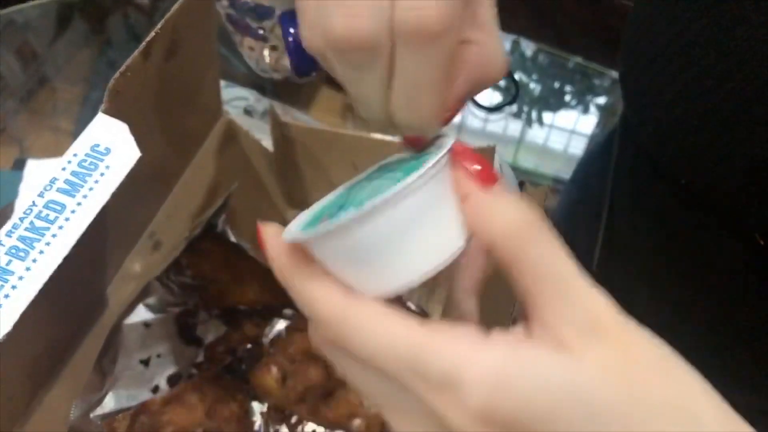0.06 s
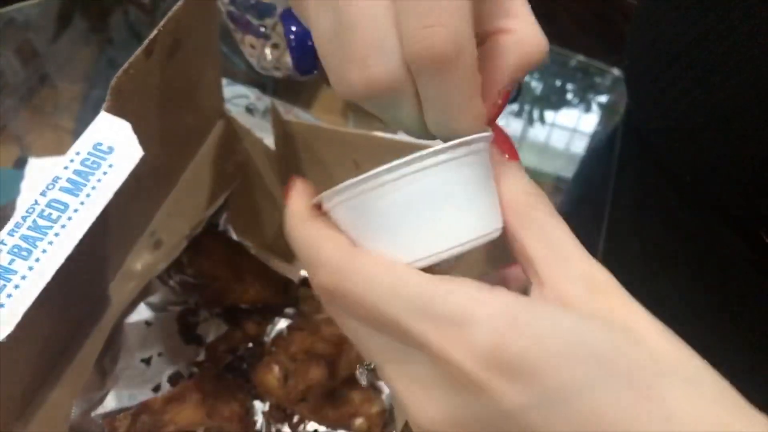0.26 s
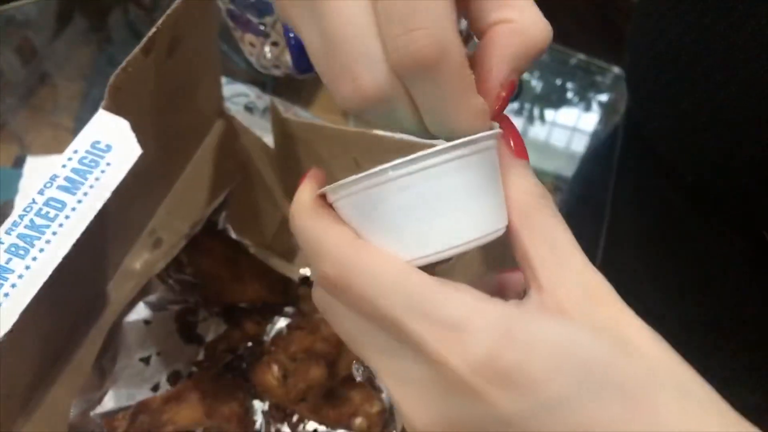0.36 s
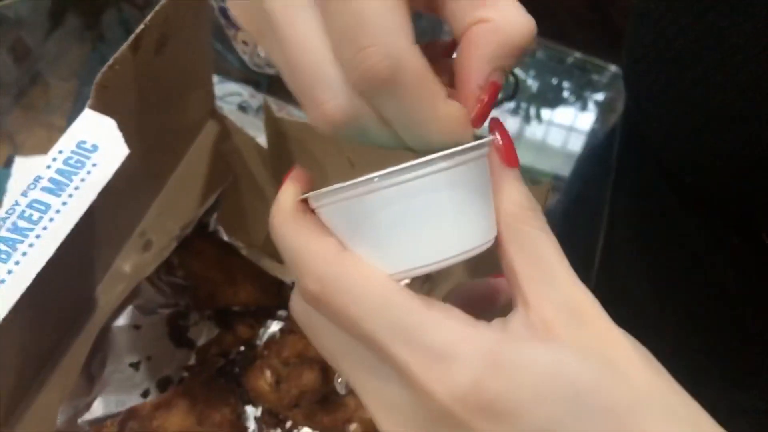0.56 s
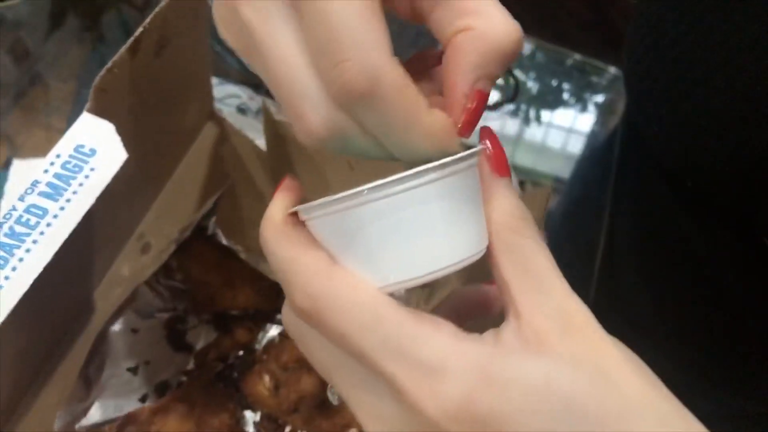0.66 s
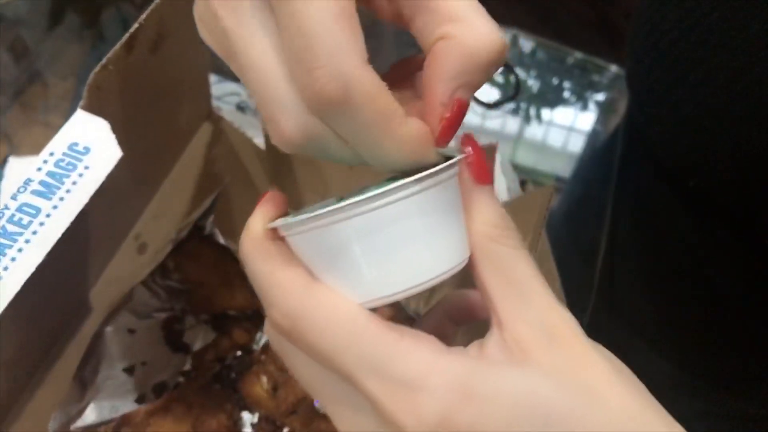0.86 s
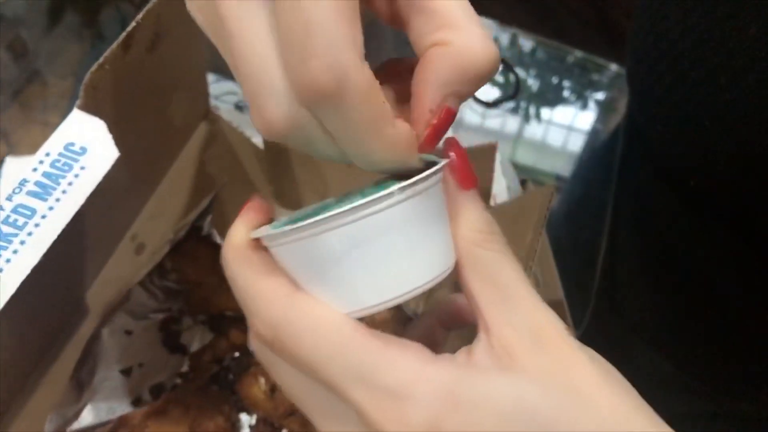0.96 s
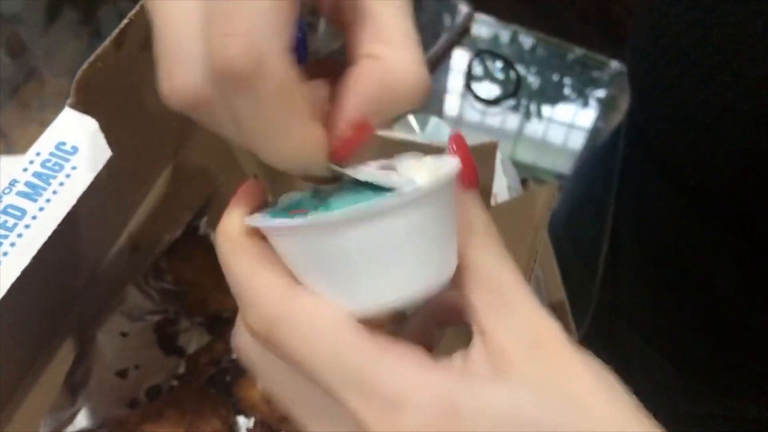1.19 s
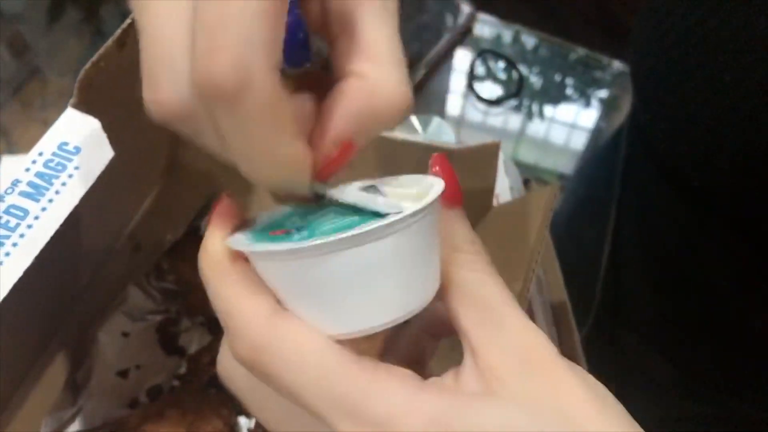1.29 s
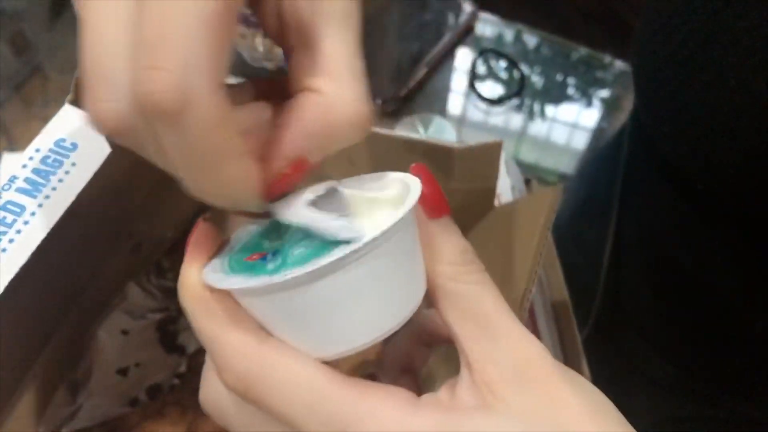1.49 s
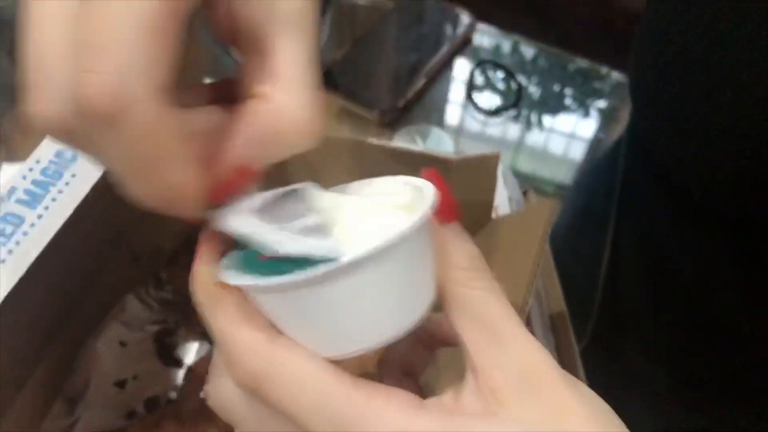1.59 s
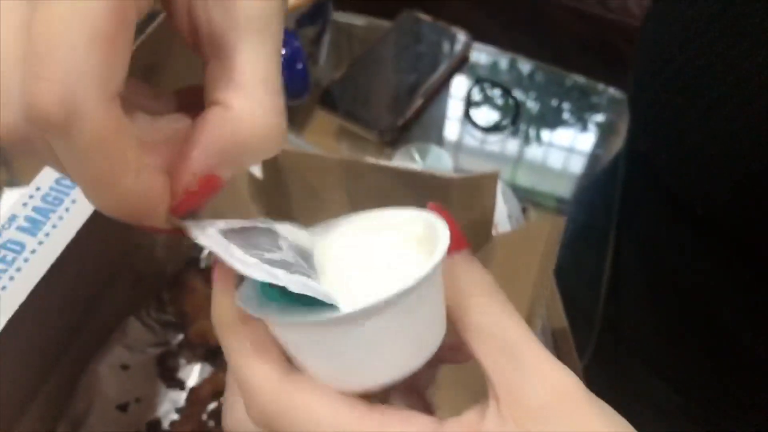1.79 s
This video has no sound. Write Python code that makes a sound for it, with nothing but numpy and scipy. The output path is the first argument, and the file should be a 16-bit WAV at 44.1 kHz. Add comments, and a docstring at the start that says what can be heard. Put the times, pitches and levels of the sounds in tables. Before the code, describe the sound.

A foil lid peels off a small plastic cup in sharp separate snaps, then dense crinkles

```python
"""A foil lid is peeled off a small plastic cup, close by in a quiet room with low rumble and faint hiss.
A faint rasp of glue comes first; from 0.17 to 1.36 s the seal gives way in separate snaps.
Each snap is a noise burst (foil buckling) plus decaying sines: foil modes and the cup's thin wall.
From 0.95 s slip grains rasp and the loose lid flaps; creases crinkle, most densely at 1.44-1.49 s.
Fingers bump the cup (decaying low modes) from 0.78 s, mostly near the end; a faint rub closes."""
import sys
import numpy as np
from scipy import signal
from scipy.fft import rfft, irfft
from scipy.io import wavfile

SR = 44100
rng = np.random.default_rng(int(sys.argv[2]) if len(sys.argv) > 2 else 0)


def bounce(signal):
    """Save signal as a 16-bit WAV file at the path given by the first command-line argument."""
    frames = np.transpose(np.atleast_2d(signal))
    limited = np.clip(frames, -1, 1)
    pcm = np.round(limited * 32767).astype(np.int16)
    wavfile.write(sys.argv[1], SR, pcm)


N = 81585
T = np.arange(N) / SR
EVENT_SAMPLES = SR // 10


def from_db(db):
    """Decibels to gain."""
    return 10 ** (np.asarray(db) / 20)


def rms_one(x):
    """Scale to unit rms."""
    return x / np.sqrt(np.mean(x ** 2) + 1e-20)


def cut(x, hz, kind, order=2):
    """Butterworth low- or high-pass."""
    sos = signal.butter(order, min(hz, .45 * SR), kind, fs=SR, output="sos")
    return signal.sosfilt(sos, x)


def colour(x, points):
    """Causal (minimum-phase) filter through (f/Hz, level/dB) points, with unit power gain."""
    hz, db = np.transpose(points)
    size = 2048
    bins_hz = np.arange(size + 1) * SR / (2 * size)
    gain = rms_one(from_db(np.interp(np.log(bins_hz + 1), np.log(hz), db)))
    # fold the cepstrum to its causal half: minimum phase
    cepstrum = irfft(np.log(gain))[:size]
    cepstrum[1:] *= 2
    impulse = irfft(np.exp(rfft(cepstrum, 2 * size)))
    return signal.fftconvolve(x, impulse)[:len(x)]


def add(out, start_s, sound):
    """Mix a sound into out at a time."""
    i = int(start_s * SR)
    out[i:i + len(sound)] += sound[:N - i]


def dying(t60_s):
    """A tenth of a second of exponential decay."""
    return from_db(-60 * T[:EVENT_SAMPLES] / t60_s)


def ring(hz, db, t60_s):
    """One struck mode: an exponentially decaying sine."""
    return from_db(db) * dying(t60_s) * np.sin(2 * np.pi * hz * T[:EVENT_SAMPLES])


# room tone spectrum: [f/Hz, relative level/dB]
ROOM_TONE_SPECTRUM = [(12, -41.5), (20, 2.5), (61, 2.5), (81, -4.5), (98, -19), (130, -13.5), (222, -12),
                      (277, -14.5), (459, -30), (660, -30), (759, -32), (1290, -31.5), (1610, -31),
                      (12100, -44.5), (16000, -91)]
ROOM_TONE_RMS_DB = -47.5


def room_tone():
    """Low rumble and faint hiss: coloured steady noise."""
    noise = colour(rng.standard_normal(N + SR), ROOM_TONE_SPECTRUM)[SR:]  # skip filter onset
    return from_db(ROOM_TONE_RMS_DB) * rms_one(noise)


# colour of the room's echo: [f/Hz, relative level/dB]
ECHO_SPECTRUM = [(200, -9.5), (700, 1), (1000, -4.5), (1500, 1.5), (1850, 2), (2100, 9.5), (3200, -0.5),
                 (4600, -1), (6400, -4.5), (9000, -3), (14000, -3.5)]
ECHO_DB, FIRST_ECHO_S = -9.5, 0.0056
ECHO_T60_S, ECHO_TREBLE_T60_S, ECHO_SPLIT_HZ = 0.51, 0.28, 5470


def room(x):
    """Diffuse echo that starts with the nearest surfaces; the treble dies sooner."""
    low = cut(rng.standard_normal(N), ECHO_SPLIT_HZ, "low") * from_db(-60 * T / ECHO_T60_S)
    high = cut(rng.standard_normal(N), ECHO_SPLIT_HZ, "high") * from_db(-60 * T / ECHO_TREBLE_T60_S)
    echo = colour((low + high) * (T > FIRST_ECHO_S), ECHO_SPECTRUM)
    echo /= np.linalg.norm(echo)
    return from_db(ECHO_DB) * signal.fftconvolve(x, echo)[:N]


# nearby surfaces: [delay/s, level/dB]
REFLECTIONS = [(.0112, -24), (.0143, -29), (.0185, -26)]


def reflected(x):
    """The direct sound and its first reflections: delayed, weaker copies."""
    copies = [from_db(db) * np.interp(T - delay_s, T, x, left=0) for delay_s, db in REFLECTIONS]
    return x + sum(copies)


# fingers bump the cup: [t/s, level/dB]
BUMPS = [(.781, -40), (1.175, -44.5), (1.583, -39), (1.621, -36.5), (1.729, -42)]
# modes of the held cup: [f/Hz, level re bump/dB, t60/s]
BUMP_MODES = [(141, 0.5, 0.039), (242.3, 1, 0.021), (468, -5, 0.026), (917, -5.5, 0.027), (1560, 0, 0.0049)]


def fingers():
    """Soft knocks on the held cup: damped modes of alternating sign."""
    out = np.zeros(N)
    for start_s, bump_db in BUMPS:
        for k, (hz, mode_db, t60_s) in enumerate(BUMP_MODES):
            add(out, start_s, (-1) ** k * ring(hz, bump_db + mode_db, t60_s))
    return out


GRAINS_PER_S, GRAIN_SPREAD_DB = 1500, 3.5
STRETCH_EDGE_S = 0.017


def grains(spectrum):
    """Dense tiny slips of uneven size: random signed impulses, coloured, unit rms."""
    sizes = from_db(GRAIN_SPREAD_DB * np.minimum(rng.exponential(1, N), 4))
    slips = sizes * rng.choice([-1, 1], N) * (rng.random(N) < GRAINS_PER_S / SR)
    return rms_one(colour(slips, spectrum))


def stretches(rows):
    """Gain over time of soft-edged stretches of friction."""
    gain = np.zeros(N)
    for start_s, length_s, db in rows:
        inside_s = np.minimum(T - start_s, start_s + length_s - T)
        gain += from_db(db) * np.clip(inside_s / STRETCH_EDGE_S + .5, 0, 1)
    return gain


# the loose lid flaps: [t/s, length/s, level/dB]
FLAPS = [(.965, 0.027, -46), (1.385, .03, -56.5), (1.44, 0.055, -45)]
# flap spectrum: [f/Hz, relative level/dB]
FLAP_SPECTRUM = [(100, -10), (250, -2), (420, 0), (650, -3), (900, -16), (2000, -45)]


def flaps():
    """The loose lid flaps dully: low-coloured grains."""
    return stretches(FLAPS) * grains(FLAP_SPECTRUM)


# rasping glue and rubbing foil: [t/s, length/s, level/dB]
RASPS = [(.035, 0.018, -56.5), (.957, 0.046, -33), (1.008, 0.012, -31), (1.312, 0.03, -51.5),
         (1.374, 0.023, -39), (1.44, 0.056, -40), (1.697, 0.0084, -56), (1.78, 0.074, -59)]
# rasp spectrum: [f/Hz, relative level/dB]
RASP_SPECTRUM = [(300, -45.5), (900, -6), (1400, -0.5), (2300, -8.5), (4000, -1), (6300, 0), (8000, -7),
                 (11000, -11), (15000, -36)]


def rasps():
    """Glue rasps and foil rubs: bright slip grains."""
    return stretches(RASPS) * grains(RASP_SPECTRUM)


# colour of the crack: [f/Hz, relative level/dB]
CRACK_SPECTRUM = [(500, -77), (850, -28), (1300, -7), (2200, -9), (3300, 2), (4800, -1), (6700, 5),
                  (7900, -2), (9500, 3), (10500, -5), (11500, 0), (13500, -11.5), (16000, -21)]
CRACK_DB, CRACK_LOW_HZ = -5, 918  # level re event


def crack(event_db, top_hz, t60_s):
    """The foil buckles: a burst of a few milliseconds, whitened, then coloured and band-limited."""
    envelope = dying(t60_s)
    burst = rng.standard_normal(EVENT_SAMPLES) * envelope
    spectrum = rfft(burst, 2 * len(burst))
    # keep phase only: energy spread evenly over frequency
    burst = irfft(spectrum / np.abs(spectrum))[:len(burst)] * np.linalg.norm(envelope)
    burst = cut(colour(burst, CRACK_SPECTRUM), top_hz, "low")
    return from_db(event_db + CRACK_DB) * cut(burst, CRACK_LOW_HZ, "high")


FOIL_LOW_HZ = 2020  # high-pass on all foil ringing
CRINKLE_TOP_HZ, CRINKLE_T60_S = 5800, 0.007
CRINKLE_MODE_DB = -0.5  # re crease
# creases as the lid folds back: [t/s, level/dB, main foil mode f/Hz]
CRINKLES = [(0.9618, -30, 3400), (0.976, -26, 4470), (1.011, -21, 5320), (1.3322, -33, 5900),
            (1.444, -22, 3340), (1.453, -24, 3400), (1.4561, -23.5, 2400), (1.4645, -18, 3090),
            (1.4684, -17.5, 4030), (1.4768, -21.5, 6480), (1.4875, -23, 5660)]


def crinkles():
    """Each crease cracks and rings one foil mode. Returns cracks and foil ringing."""
    cracks, foil = np.zeros((2, N))
    for start_s, db, hz in CRINKLES:
        add(cracks, start_s, crack(db, CRINKLE_TOP_HZ, CRINKLE_T60_S))
        add(foil, start_s, ring(hz, db + CRINKLE_MODE_DB, CRINKLE_T60_S))
    return cracks, cut(foil, FOIL_LOW_HZ, "high")


CUP_T60_S, CUP_TOP_HZ = .016, 2200
WALL_LOW_HZ = 937  # the small wall radiates almost nothing below this
FLEX_HZ, FLEX_T60_S = 560, 0.0092  # the whole cup flexes a little


def cup(modes, flex_db):
    """The cup springs back in a few modes, which shift with the grip and the opening, over a dull thump."""
    wall = sum(ring(hz, db, CUP_T60_S) for hz, db in modes)
    wall = cut(wall, WALL_LOW_HZ, "high", order=8)
    wall = cut(wall, CUP_TOP_HZ, "low", order=3)
    return wall + ring(FLEX_HZ, flex_db, FLEX_T60_S)


MODE_SPREAD_S = .0012


def late(sound):
    """Start a mode after a short random time: bending waves take a moment to cross the foil."""
    delay = int(rng.random() * MODE_SPREAD_S * SR)
    return np.pad(sound, (delay, 0))[:len(sound)]


FOIL_RING_CYCLES = 57.4  # cycles per 60 dB of decay
# ringing that all snaps share: [f/Hz, level re foil/dB]
FOIL_MODES = [(2450, -22), (3914, -16), (4380, -12), (4780, -19), (5350, -15.5), (6850, -10), (8270, -18),
              (9550, -5.5), (11070, -20)]


def foil_ringing(foil_db, top_hz, own_modes):
    """Shared and own foil modes, signs alternating; each dies in the same number of cycles."""
    ringing = np.zeros(EVENT_SAMPLES)
    for k, (hz, db) in enumerate(list(FOIL_MODES) + list(own_modes)):
        ringing += (-1) ** k * late(ring(hz, foil_db + db, FOIL_RING_CYCLES / hz))
    return cut(ringing, top_hz, "low")


CRACK_T60_S = 0.017
# the seal gives way: [t/s, foil level/dB, foil roll-off f/Hz, cup flex level/dB,
#   cup modes (f/Hz, level/dB), foil modes (f/Hz, level re foil/dB)]
SNAPS = [(0.1744, -40, 4500, -57, [(970, -31.5), (1160, -31.5)], [(4660, -7)]),
         (0.24, -23, 6500, -46, [(960, -22.5), (1090, -29), (1491, -25.5)], [(2150, -10), (3295, 1),
         (4382, 1.5), (6400, 0.5)]), (0.3374, -32, 3400, -46, [(995, -28), (1594, -23.5)], [(3550, 4.5),
         (5700, 1)]), (.3824, -6, 10800, -32, [(1090, -14.5), (1400, -12), (1620, -15.5)], [(3100, -12),
         (3600, -7.5), (5850, -4), (6500, -0.5)]), (0.4006, -15.5, 3870, -30, [(1180, -13.5),
         (1400, -12.5)], [(3280, -8)]), (0.6138, -27.5, 2000, -32.5, [(990, -25), (1200, -22.5),
         (1410, -24.5)], [(3000, -3)]), (.6449, -23.5, 7000, -42.5, [(1030, -28.5), (1220, -30)],
         [(4100, -6), (4900, -6.5), (6650, 0)]), (0.6566, -33, 8000, -62, [(1500, -30.5)], [(5740, 1)]),
         (0.778, -13, 8500, -44, [(1400, -24.5)], [(6300, -5)]),
         (0.7802, -11.5, 8550, -33.5, [(1000, -25.5), (1420, -16), (1800, -26.5)], [(2400, -12), (3060, -5),
         (6310, 7)]), (0.9538, -22.5, 14800, -55, [(1330, -28.5)], [(6830, 0.5)]),
         (0.9689, -20, 11000, -50, [(1250, -28)], [(6050, -7)]),
         (0.9791, -26.5, 7000, -42.5, [(1330, -16.5), (1600, -25.5)], [(5800, 4)]),
         (0.9968, -6.5, 11400, -31.5, [(960, -8), (1330, -22.5), (1700, -6.5)], [(3370, -9), (5100, -2),
         (5550, 0.5)]), (1.3106, -35, 5800, -51, [(1050, -35.5), (1910, -37)], [(5800, 1)]),
         (1.3520, -17, 4970, -41.5, [(980, -19.5), (1500, -25.5), (1830, -14)], [(2144, -1), (3200, -4.5)]),
         (1.3591, -4, 6000, -37.5, [(1074, -11.5), (1480, -19.5), (1900, -28.5)], [(2070, -11),
         (2600, -16.5), (3200, -6.5), (6520, 2)])]


def snaps():
    """Each snap cracks the foil and rings foil and cup. Returns cracks, foil ringing and cup."""
    cracks, foil, wall = np.zeros((3, N))
    for start_s, foil_db, top_hz, flex_db, cup_modes, own_modes in SNAPS:
        add(foil, start_s, foil_ringing(foil_db, top_hz, own_modes))
        add(cracks, start_s, crack(foil_db, top_hz, CRACK_T60_S))
        add(wall, start_s, cup(cup_modes, flex_db))
    return cracks, cut(foil, FOIL_LOW_HZ, "high"), wall


# radiated into the room re direct: all directions, so flatter resonances
CRACK_AROUND_DB, FOIL_AROUND_DB, CUP_AROUND_DB = 3.5, -6, -4


def scene():
    """Lid, cup and fingers in the room."""
    snap_cracks, snap_foil, wall = snaps()
    crease_cracks, crease_foil = crinkles()
    cracks = snap_cracks + crease_cracks
    foil = snap_foil + crease_foil
    handling = rasps() + flaps() + fingers()
    around = from_db(CRACK_AROUND_DB) * cracks + from_db(FOIL_AROUND_DB) * foil
    around += from_db(CUP_AROUND_DB) * wall
    direct = reflected(cracks + foil + wall + handling)
    return (direct + room(around + handling) + room_tone())[None]


CUTOFF_HZ = 17200


def record(dry):
    """The top is cut by a steep low-pass."""
    return signal.sosfilt(signal.cheby2(16, 90, CUTOFF_HZ, fs=SR, output="sos"), dry)


dry = scene()
out = record(dry)
bounce(out)
```